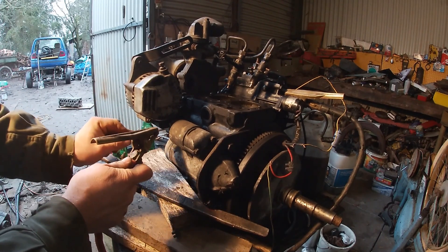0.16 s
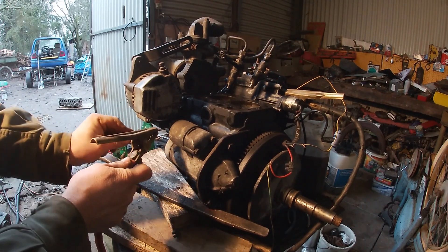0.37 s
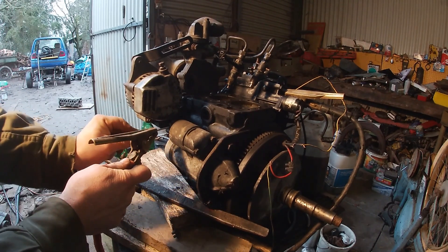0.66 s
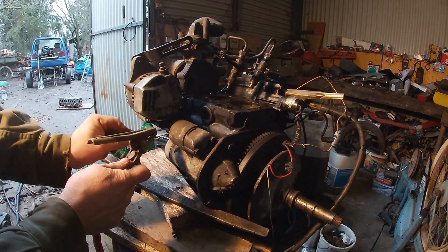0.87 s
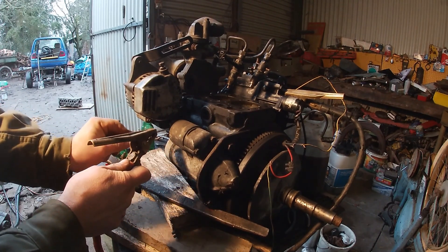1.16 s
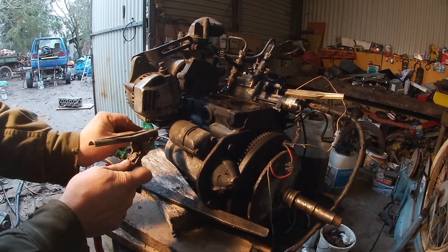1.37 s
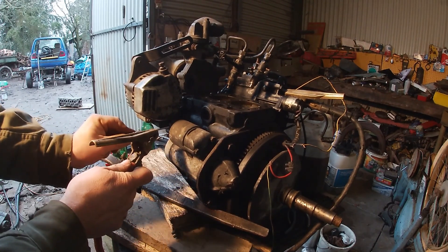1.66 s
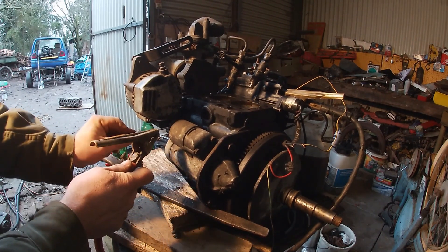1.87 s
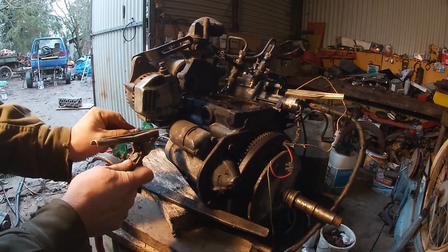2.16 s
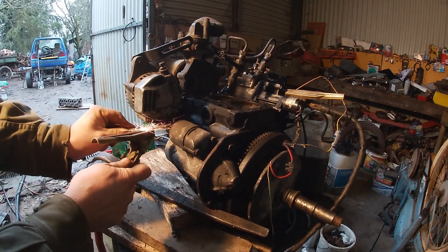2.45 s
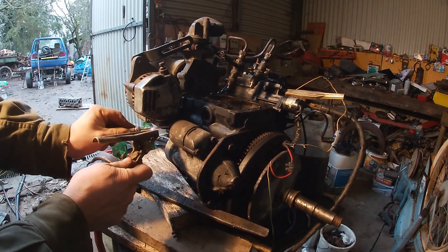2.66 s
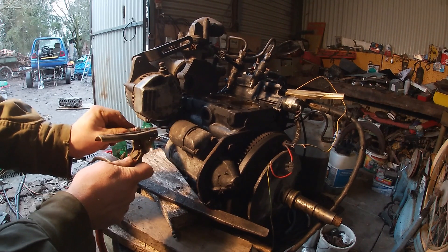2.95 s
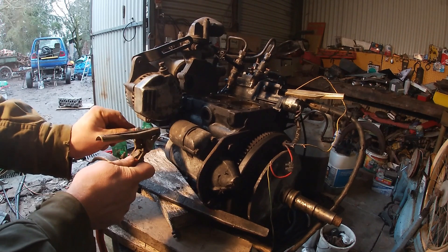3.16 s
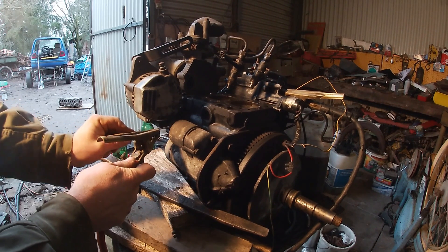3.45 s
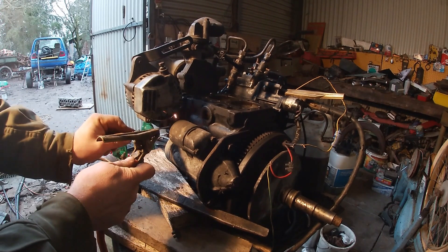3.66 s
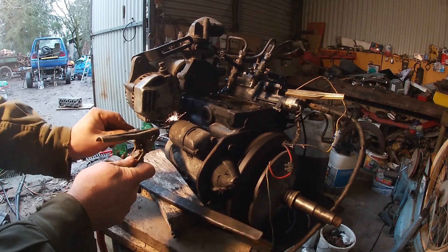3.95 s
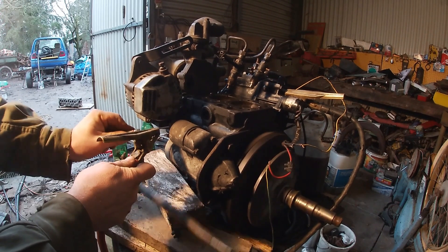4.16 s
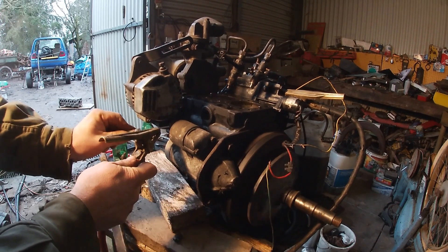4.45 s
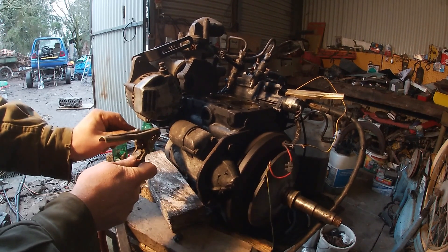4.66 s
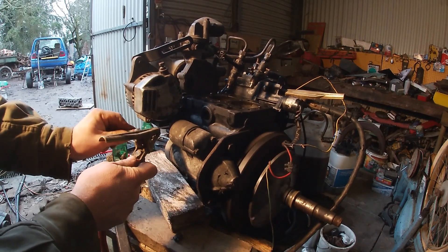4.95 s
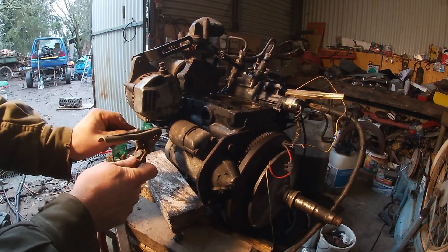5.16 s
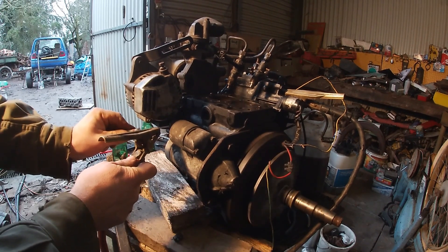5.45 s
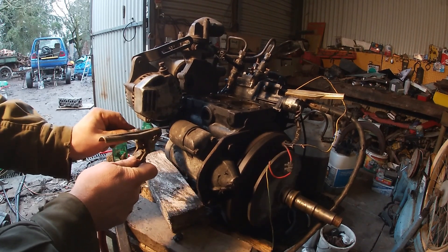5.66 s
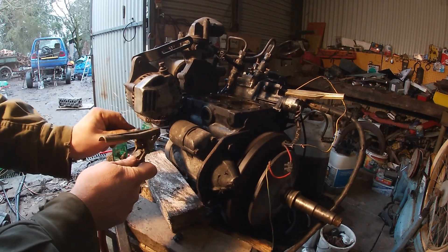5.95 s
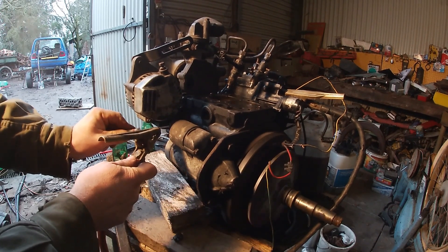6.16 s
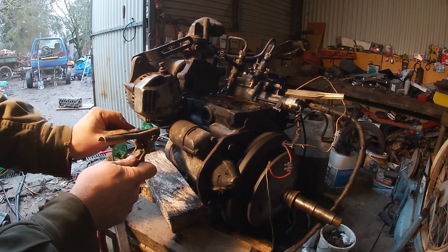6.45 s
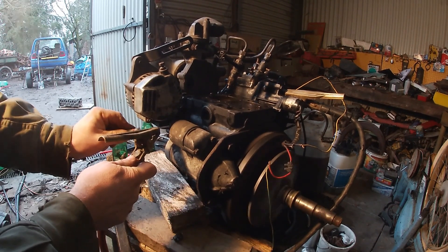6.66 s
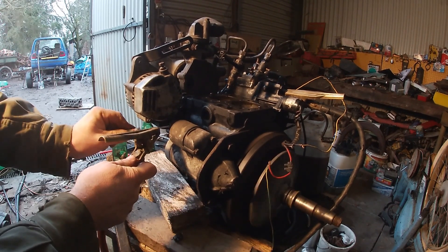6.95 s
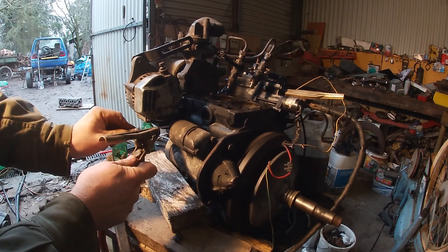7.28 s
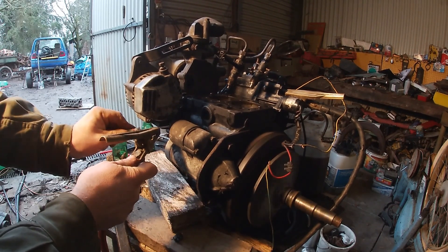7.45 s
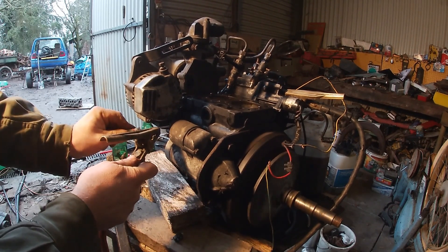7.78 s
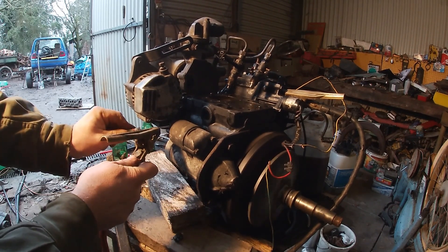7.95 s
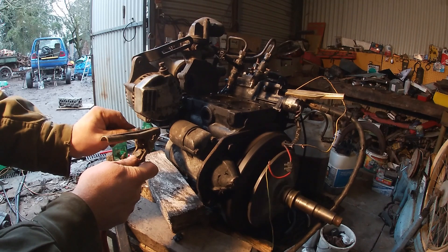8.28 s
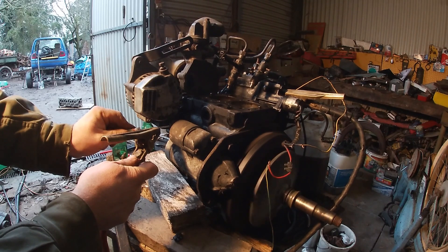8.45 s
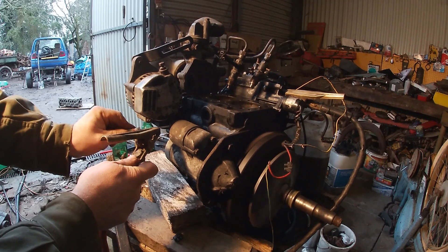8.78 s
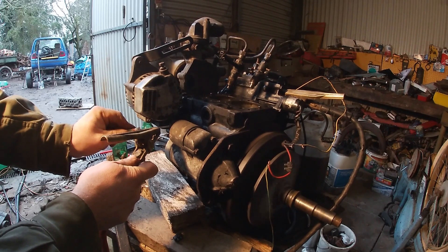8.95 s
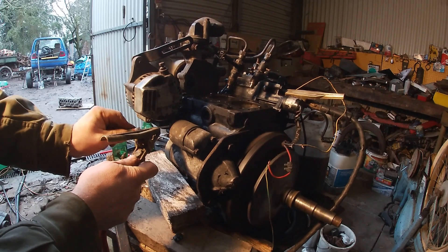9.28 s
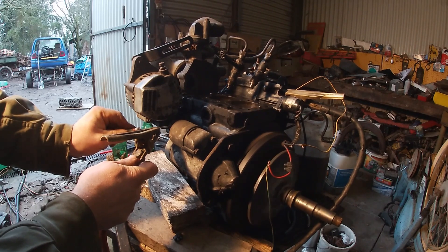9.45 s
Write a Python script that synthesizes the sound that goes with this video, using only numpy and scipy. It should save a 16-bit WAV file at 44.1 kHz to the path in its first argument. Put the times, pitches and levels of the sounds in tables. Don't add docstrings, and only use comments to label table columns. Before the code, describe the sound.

Metal clicks and quiet fumbling give way to crackling electric contacts and brief starter whirs, hard wooden thumps, then rattling cranking that never fires

```python
import sys
import numpy as np
from scipy import signal
from scipy.fft import rfft, irfft
from scipy.io import wavfile
from scipy.ndimage import uniform_filter1d

SR = 44100
rng = np.random.default_rng(int(sys.argv[2]) if len(sys.argv) > 2 else 0)


def ratio_of_db(decibels):
    return 10 ** (np.asarray(decibels, float) / 20)


def file_out(sig):
    cols = np.atleast_2d(sig).T
    lim = np.clip(cols, -1, 1)
    pcm = np.round(lim * 32767).astype(np.int16)
    wavfile.write(sys.argv[1], SR, pcm)


N = 424241
TIME = np.arange(N) / SR
CONTROL_STEP = 16
ENGAGE_S = 5.36
ENGAGED = TIME > ENGAGE_S

# (frequency [Hz], spectral density [dB per Hz])
BRUSH_SPECTRUM = [(2940, -19), (5000, -0.5), (5300, -2), (6000, 3.5), (6710, 4.5), (7280, 5), (8090, 5.5),
                  (8450, 1), (9040, -3.5), (9950, -11), (10500, -26), (11900, -14.5), (13400, -53),
                  (14600, -46), (15800, -56)]
# (frequency [Hz], spectral density [dB per Hz])
WOOD_SPECTRUM = [(45, -20), (88, -2.5), (150, -0.5), (442, -4.5), (782, -3), (986, -5.5), (1590, -7),
                 (1750, -10), (2650, -13.5), (4600, -21), (6000, -36), (7800, -50), (13200, -120)]
# (frequency [Hz], spectral density [dB per Hz])
FRICTION_SPECTRUM = [(880, -40), (1500, -3.5), (2220, -4), (2800, 0.5), (3050, -3), (3820, -6.5),
                     (6670, -8.5), (7690, -3.5), (9000, -18), (11000, -38), (14300, -70), (22000, -120)]


def unit(x):
    return x / np.sqrt(np.mean(x ** 2))


def colour(x, points):
    hz, db = np.transpose(points)
    grid = np.maximum(np.fft.rfftfreq(8192, 1 / SR), 1)
    cepstrum = irfft(np.log(ratio_of_db(np.interp(np.log(grid), np.log(hz), db))))
    cepstrum[1:4096] *= 2
    cepstrum[4097:] = 0
    response = irfft(np.exp(rfft(cepstrum)))[:4096]
    return signal.oaconvolve(x, response / np.sqrt(np.sum(response ** 2)))[:len(x)]


def resonate(x, hz, q):
    return signal.lfilter(*signal.iirpeak(hz, q, SR), x)


def ring(x, modes, flicker_db, later=0):
    total = 0
    for k, (hz, width, db, *gained) in enumerate(modes):
        drive = x * ratio_of_db(db + later * sum(gained) + flicker_db * walk(35))
        total = total + (-1) ** k * resonate(drive, hz, hz / width)
    return unit(total)


def highpass(x, order, hz):
    return signal.lfilter(*signal.butter(order, hz, "high", fs=SR), x)


def walk(rate):
    k = int(SR / rate)
    levels = np.repeat(rng.standard_normal(N // k + 1), k)
    return 1.3 * uniform_filter1d(uniform_filter1d(levels, k), k)[:N]


def grit(scatter_db):
    size = np.minimum(rng.exponential(size=N), 4.5)
    return unit(rng.standard_normal(N) * ratio_of_db(scatter_db * size))


def add(out, s, sound):
    i = int(s * SR)
    out[i:i + len(sound)] += sound[:N - i]


def control_time():
    return np.arange(0, N, CONTROL_STEP) / SR


def held(control):
    return np.repeat(control, CONTROL_STEP, axis=-1)[..., :N]


def swells(s, db, fade_s, rise_share):
    t, total = control_time(), 0
    for at, peak_db, fade in zip(s, db, fade_s):
        away = np.maximum((t - at) / fade, (at - t) / (fade * rise_share))
        total = total + ratio_of_db(peak_db - 20 * away)
    return held(total)


def effort():
    # (time [s], rise [s], powered
    # [s], gear chatter [dB], brush hiss [dB])
    contacts = [(0.0, 0.00073, .3, -32.5, -39), (2.582, 0.023, 0.53, -23, -27),
                (3.413, 0.012, .44, -22.5, -25.5), (3.933, 0.0068, 0.41, -21, -22.5),
                (4.06, 0.065, .3, -25.5, -23), (4.265, 0.0089, 0.091, -23, -25.5),
                (4.547, 0.0036, .01, -25, -30), (5.095, 0.0043, .3, -34, -50),
                (5.362, 0.03, .12, -30.5, -55), (5.434, 0.0089, .1, -22, -41),
                (5.47, 0.035, 0.1, -17, -26.5), (5.865, 0.045, 0.15, -17, -25.5),
                (6.355, 0.039, 4.0, -17.5, -25.5)]
    # (time [s], depth [dB], length [s])
    slips = [
        (3.851, 5.5, 0.072),
        (3.044, 5, 0.068),
        (5.602, 4.5, 0.032),
        (7.276, 6, 0.015),
        (8.59, 2, 0.018),
        (8.775, 8.5, 0.015),
        (9.389, 6, 0.015),
    ]
    stalls_s = (0.0, 5.1)
    t, gain = control_time(), 0
    for s, rise, powered, gear_db, brush_db in contacts:
        on = np.maximum(t - s - rise, 0)
        off = np.maximum(t - s - powered, 0)
        stalled = np.maximum(t - min([x for x in stalls_s if x >= s], default=N), 0)
        stalled = stalled * (1 + stalled / 0.13)
        inrush = (s < ENGAGE_S) * 2 * np.exp(-on / 0.058)
        coast = 8.5 * (1 - np.exp(-off / 0.27))
        gear = gear_db + inrush - coast - 57 * stalled
        lag = 6 * np.exp(-on / 0.03)
        brush = brush_db - lag - 38 * off - 88 * stalled
        gain = gain + np.clip((t - s) / rise, 0, 1) * (ratio_of_db(np.array([gear, brush])) - gain)
    slip_db = 0
    for s, depth_db, length in slips:
        inside = np.minimum(t - s, s + length - t)
        slip_db = slip_db + depth_db * np.clip(inside / 0.0032 + 1, 0, 1)
    return held(gain * ratio_of_db(-slip_db * np.array([[1], [1.3]])))


def gear_chatter(turn):
    # (frequency [Hz], width [Hz], level [dB], gain at full speed [dB])
    housing_modes = [(1240, 153, 1, 0.5), (1319, 37, 7, -0.5), (1583, 97, -2, -0.5), (1760, 13, -3, -8),
                     (1831, 15, -5.5, -2), (2248, 140, 3, 0), (2990, 100, -2.5, 0), (3100, 18, 5, 0.5),
                     (3213, 64, -6, 4.5), (3355, 32, 5, -0.5), (3710, 197, -1.5, -0.5), (4500, 27, -4.5, 3),
                     (4750, 104, -5, 2.5), (5880, 256, -3.5, -0.5), (6510, 270, -6, 1.5)]
    # (frequency [Hz], width [Hz], level [dB], gain once run in [dB])
    pinion_modes = [(1207, 255, 2.5, 0), (1860, 45, 3, 3), (2108, 87, 6.5, -3.5), (2580, 56, 3.5, 3.5),
                    (2985, 100, 5.5, -8), (3190, 110, -0.5, 7), (3750, 150, -2.5, 0), (5570, 75, -1, -9),
                    (4960, 33, -2, 0.5)]
    # (frequency [Hz], spectral density [dB per Hz])
    gear_spectrum = [(350, -45.5), (600, -9), (887, -15.5), (1240, -0.5), (1990, -9), (2570, -9.5),
                     (2790, -3), (3800, 1.5), (5320, -14), (6600, -11), (10000, -25), (15000, -47)]
    teeth = grit(2.5) * ratio_of_db(2.2 * turn + .5 * walk(14))
    run_in = np.interp(TIME, (3.3, 4.0), (0, 1))
    settled = np.interp(TIME, (6.8, 8.1), (0, 1))
    cranking = ring(teeth, housing_modes, 2.2, settled)
    free = .9 * ring(teeth, pinion_modes, 3.0, run_in)
    broad = ratio_of_db(-3.5 * settled) * colour(teeth, gear_spectrum)
    return unit(0.61 * broad + 0.87 * np.where(ENGAGED, cranking, free))


def brush_hiss():
    # (frequency [Hz], spectral density [dB per Hz])
    loaded_spectrum = [(2940, -23.5), (5000, 0.5), (5320, -4.5), (5780, 0), (6710, 4), (8210, -12.5),
                       (9810, -9), (11300, -28.5), (14300, -23.5), (15100, -46), (15800, -47)]
    # (frequency [Hz], width [Hz], level [dB])
    cap_modes = [(4910, 130, 8.5), (7000, 170, 5), (7600, 30, -17), (8100, 95, 5.5), (8720, 140, 8),
                 (11500, 80, -30), (11800, 200, -35.5)]
    rub = grit(3.5) * ratio_of_db(1.5 * walk(30))
    free = colour(rub, BRUSH_SPECTRUM) + .5 * 0.97 * ring(rub, cap_modes, flicker_db=3.5)
    return np.where(ENGAGED, colour(rub, loaded_spectrum), free)


def block_rumble():
    # (frequency [Hz], spectral density [dB per Hz])
    block_spectrum = [(35, -41), (60, -9), (113, -16), (161, -2), (190, -4.5), (268, -8), (308, 0.5),
                      (368, -3.5), (639, -4), (736, -7.5), (932, -6.5), (1000, -1), (1300, -32.5),
                      (2200, -120)]
    rumble = colour(grit(0.66) * ratio_of_db(1.02 * walk(12)), block_spectrum)
    return np.where(ENGAGED, rumble, highpass(rumble, 3, 78))


def bell_peal(turn):
    # (frequency [Hz], width [Hz], level [dB])
    bell_modes = [(2592, 26, 0)]
    # (frequency [Hz], width [Hz], level [dB])
    rim_modes = [(2522, 34, 2), (2556, 34, 0)]
    blows = grit(3.6) * ratio_of_db(2.3 * turn)
    rim = ring(ring(blows, rim_modes, flicker_db=0.5), [(2538, 74, 0)], flicker_db=1.5)
    rim_share = np.interp(TIME, (7.3, 7.9), (.3, .85))
    return resonate(ring(blows, bell_modes, flicker_db=1.0) + rim_share * rim, 2565, 11)


def bell_flares():
    # (time [s], level [dB])
    flares = [(3.5, 9), (6.02, 7), (6.27, 14), (6.47, 3), (6.58, 1), (6.7, 5), (6.84, 6.5), (6.97, 7),
              (7.09, 6), (7.15, 8), (7.2, 5), (7.33, 5), (7.47, 9), (7.63, 2), (7.928, 9), (7.97, -1),
              (8.07, 3), (8.12, 5), (8.2, 1.5), (8.25, 9.5), (8.36, 8.5), (8.41, 3), (8.45, 6),
              (8.515, 2.5), (8.545, 12.5), (8.75, 1), (8.845, 5), (8.96, 8.5), (9.07, 1), (9.13, 7),
              (9.35, 7.5), (9.45, 5), (9.5, -1), (9.57, 7)]
    t = control_time()
    return held(sum(1.14 * db * np.exp(-((t - s) / 0.016) ** 2) for s, db in flares))


def motor():
    gear, brush = effort()
    full = gear / ratio_of_db(-20)
    turn_hz = 40.12 * (1 + 0.05934 * walk(4.5))
    turn = np.cos(2 * np.pi * np.cumsum(turn_hz) / SR)
    block = ratio_of_db(np.where(ENGAGED, -30, -35.5)) * full ** 0.34
    cranked_db = -29.5 + np.interp(TIME, (6.15, 6.3), (-4, 0))
    bell = ratio_of_db(np.where(ENGAGED, cranked_db, -41) + bell_flares()) * full ** 1.6
    return gear * gear_chatter(turn) + brush * brush_hiss() + block * block_rumble() + bell * bell_peal(turn)


def air():
    # (time [s], level [dB], time to fade 20 dB [s])
    gusts = [(.5, -56, 0.1), (1.5, -43.5, 0.3), (2.35, -48, 0.8), (2.6, -29.5, 0.12), (3.91, -35, 0.28),
             (4.6, -32, 0.22), (5.7, -58, -2), (6.3, -60, -1), (7.3, -54, 0.5), (8.4, -52, 1),
             (9.3, -51, 0.5)]
    # (frequency [Hz], spectral density [dB per Hz])
    yard_spectrum = [(29, -35), (50, -23), (93, -15), (177, 9.5), (241, -1), (586, -14), (817, -8),
                     (1330, -8), (2170, -34), (7330, -48), (10000, -46), (13000, -80), (22000, -120)]
    low = signal.butter(3, [16, 48], "band", fs=SR, output="sos")
    push = unit(signal.sosfilt(low, rng.standard_normal(N)))
    wind = (ratio_of_db(-73) + swells(*np.transpose(gusts), rise_share=1.15)) * push
    return wind + ratio_of_db(-60 + 3.6 * walk(2.04)) * colour(rng.standard_normal(N), yard_spectrum)


def hand_moves():
    # (time [s], rustle [dB], shuffle [dB], time to fade 20 dB [s]); a negative fade swaps rise and fall
    moves = [
        (.66, -62, -56.5, 1.13),
        (.94, -45.5, -48, -0.01),
        (1.3, -47, -46, 0.18),
        (1.47, -62, -57, 0.2),
        (1.77, -62, -56, 0.3),
        (2.05, -62, -68, 0.5),
        (2.36, -75, -64, -1),
        (2.55, -65, -49, 0.07),
        (.07, -43, -39, 0.13),
        (5.2, -60, -37, 0.27),
    ]
    # (frequency [Hz], width [Hz], level [dB])
    jaw_modes = [(1700, 300, -1), (2830, 440, 1), (4700, 1200, -2.5), (6940, 400, -5), (7800, 900, -3)]
    at, rustle_db, shuffle_db, fade_s = np.transpose(moves)
    rustle = ratio_of_db(-81) + swells(at, rustle_db, fade_s, 0.34)
    shuffle = ratio_of_db(-81) + swells(at, shuffle_db, fade_s, 0.34)
    rub = grit(3.2) * ratio_of_db(2.0 * walk(39.8))
    cable = 0.88 * colour(rub, FRICTION_SPECTRUM) + .5 * ring(rub, jaw_modes, flicker_db=5.0)
    return rustle * cable + shuffle * highpass(colour(grit(4.6), WOOD_SPECTRUM), 4, 130)


def clamp_ticks():
    # (time [s], peak [dB], frequency [Hz], length [s])
    ticks = [(0.13, -30, 3800, .004), (0.157, -26, 3100, .005), (0.169, -30, 4500, .004),
             (0.228, -32, 5500, 0.0025), (0.59, -51, 7000, .004), (0.623, -36, 6500, .003),
             (0.6406, -34, 2100, .004), (0.647, -39, 6500, .004), (0.694, -42, 1800, .004),
             (0.722, -37, 1900, .014), (0.735, -41, 6500, .004), (0.8105, -31.5, 3600, .002),
             (0.930, -25, 6000, .002), (0.9436, -18, 4500, .002), (0.95, -22, 3480, .003),
             (0.990, -36, 4500, .003), (1.2467, -44, 1500, .006), (1.306, -23.5, 5140, 0.0035),
             (1.332, -43, 1650, 0.025), (1.368, -44, 2980, .004), (1.4533, -46, 7500, .006),
             (1.487, -48, 2900, 0.025), (1.538, -41, 2800, 0.0061), (1.750, -48, 1950, .004),
             (1.766, -34, 2900, .003), (1.8085, -41, 4000, .003), (2.3515, -43, 5000, .003),
             (2.518, -39, 1700, .003), (5.062, -35, 9000, .003), (5.075, -35, 9000, .003),
             (5.13, -36, 8000, .003), (5.155, -36, 8000, .003), (5.197, -39, 7500, .004),
             (5.215, -44, 7000, .004), (5.253, -37, 4500, .004)]
    out = np.zeros(N)
    t = np.arange(SR // 8) / SR
    crackle = colour(grit(2.2), FRICTION_SPECTRUM)
    rise = 1 - np.exp(-t / .00015)
    edge = ratio_of_db(-10) * 4 * np.exp(-t / 0.00055)
    for s, db, hz, length in ticks:
        burst = crackle[int(s * SR):][:len(t)] * rise * (np.exp(-t / length) + edge)
        add(out, s, ratio_of_db(db - 12.0) * (0.43 * burst + 2 * resonate(burst, hz, 1.9)))
    return signal.lfilter(*signal.butter(3, 10500, fs=SR), out)


def jaw_pings():
    # (time [s], peak [dB])
    pings = [
        (0.172, -43),
        (1.7656, -46),
    ]
    # (frequency [Hz], level [dB], T60 [s])
    clamp_modes = [(2379, -15, 0.042), (2860, 5.5, 0.045), (5200, -9, 0.025)]
    out = np.zeros(N)
    t = np.arange(SR // 8) / SR
    for s, ping_db in pings:
        for hz, mode_db, t60 in clamp_modes:
            decay = 1000. ** (-t / t60)
            add(out, s, ratio_of_db(ping_db + mode_db + 1.0) * decay * np.sin(2 * np.pi * hz * t))
    return out


def spring_squeak():
    # (time [s], frequency [Hz], level [dB])
    squeaks = [
        [(1.775, 6500, -67), (1.811, 6395, -65), (1.883, 6929, -57), (1.947, 6272, -61), (2.1, 6115, -79)],
        [(2.115, 7872, -63), (2.187, 7923, -69), (2.2, 7771, -77)],
    ]
    tone = 0
    for glide in squeaks:
        s, hz, db = np.transpose(glide)
        phase = 2 * np.pi * np.cumsum(np.interp(TIME, s, hz)) / SR
        tone = tone + ratio_of_db(np.interp(TIME, s, db, -150, -150)) * np.sin(phase)
    return tone * ratio_of_db(3.0 * walk(120))


def bench():
    # (time [s], peak [dB], frequency [Hz])
    bumps = [
        (0.509, -35, 128),
        (1.023, -39, 144),
        (1.193, -26, 192),
        (1.405, -27.5, 140),
        (1.562, -37, 155),
        (2.005, -32, 142),
        (2.15, -41.5, 145),
        (2.318, -41, 147),
        (2.472, -25, 152),
    ]
    # (time [s], peak [dB], frequency [Hz], crack [dB])
    knocks = [(2.58, -23.5, 148.3, -15.5), (2.954, -38, 281, -24), (3.11, -28, 232, -18),
              (3.416, -23, 152, -19.5), (3.52, -38, 203, -27), (3.834, -13.5, 165.5, -11.5),
              (3.879, -17, 89, -20), (3.964, -26, 160, -28), (4.267, -42, 304, -12.5),
              (4.282, -17.5, 98, -44), (4.374, -17, 79, -12), (4.394, -7, 92, -16.5),
              (4.497, -12, 101.5, -9), (4.55, -15, 106, -4), (4.562, -5, 97.7, -39),
              (4.602, -11.5, 300, -10.5), (5.087, -20, 200, -15)]
    hits = [(s, db, hz, -58, 0.037) for s, db, hz in bumps]
    hits += [(s, db, hz, crack_db, 0.058 * (100 / hz) ** 0.52) for s, db, hz, crack_db in knocks]
    rock, crack = np.zeros((2, N))
    t = np.arange(SR // 2) / SR
    sway = walk(69.0)[:len(t)]
    for s, db, hz, crack_db, length in hits:
        phase = 2 * np.pi * hz * np.cumsum(1 + 0.13 * np.roll(sway, int(s * SR))) / SR
        fade = (1 - np.exp(-t / 0.0024)) * np.exp(-(t / length) ** 2)
        overtone = 0.35 * np.exp(-t / 0.027) * np.sin(1.71 * phase)
        add(rock, s, ratio_of_db(db - 4.0) * fade * (np.sin(phase) + overtone))
        add(crack, s, ratio_of_db(crack_db - 6.5) * (1 - np.exp(-t / 0.00069)) * np.exp(-t / 0.029))
    return highpass(rock * ratio_of_db(2.5 * walk(60)) + crack * colour(grit(5.7), WOOD_SPECTRUM), 2, 65)


def arcs():
    # (time [s], peak [dB])
    snaps = [(2.5565, -4), (2.5793, -6), (2.612, -1), (2.6592, 6), (2.669, -3), (2.6772, -3.5), (2.689, 3),
             (2.6915, -2), (2.7002, -1), (2.770, 1), (2.919, -2), (3.116, -4), (3.4092, 3), (3.823, -1),
             (5.094, -17), (5.3927, 6), (5.439, -18)]
    # (frequency [Hz], spectral density [dB per Hz])
    snap_spectrum = [(300, -25), (1250, -3), (1900, -9), (3000, -3), (3400, -8), (3850, 3), (4600, -7),
                     (8000, -7), (10000, -27), (12500, -46), (16000, -70)]
    # (time [s], peak [dB], length [s], brightness [dB])
    sparks = [(2.559, -9, 0.0053, 1), (2.576, -17.5, 0.017, 8.5), (2.758, -11.5, 0.021, 5.5),
              (2.789, -13, 0.017, -8), (2.868, -4.5, 0.017, 6), (2.946, -3, 0.017, 3.5),
              (2.999, -4, 0.0089, 4), (3.032, -8, 0.0085, -3), (3.118, -6, 0.03, -15), (3.24, -7, 0.016, 2),
              (3.478, -8, 0.013, 0), (3.52, -8.5, 0.047, 2), (3.598, -4.5, 0.01, 9.5),
              (3.621, -9.5, 0.013, -4), (3.645, -6.5, 0.029, 6.5), (3.671, -8, 0.036, 3.5),
              (3.697, -5, 0.02, 3.5), (3.737, -5.5, 0.0078, 8), (3.754, -4.5, 0.0081, -15),
              (3.784, -1.5, 0.0082, 5.5), (3.823, -6.5, 0.0084, 9), (3.8314, 3.5, 0.014, -11),
              (4.549, -10, 0.012, -20), (4.602, -14, .008, -18), (5.092, -7, 0.0094, -27.5),
              (5.392, -2, 0.0054, -22)]
    # (frequency [Hz], spectral density [dB per Hz])
    spark_spectrum = [(240, -44), (400, -13.5), (597, -15), (850, 2.5), (1750, -1), (2270, 3.5),
                      (3840, -1.5), (4410, -8), (4910, -4.5), (8030, -12.5), (15800, -53)]
    dull, bright, snap = np.zeros((3, N))
    for s, db in snaps:
        add(snap, s, ratio_of_db(db) * np.array([-0.93, -0.45, 0.25, 0.3]))
    for s, db, length, bright_db in sparks:
        u = np.arange(int(2 * length * SR)) / (length * SR)
        shape = np.minimum(u / .4, 1) * np.exp(-u ** 2.5)
        start = s - .15 * length - .001
        add(dull, start, ratio_of_db(db - 11.0) * shape)
        add(bright, start, ratio_of_db(db + bright_db - 13.5) * shape)
    spit = dull * colour(grit(2.9), spark_spectrum) + bright * colour(grit(1.0), BRUSH_SPECTRUM)
    return spit + 1.25 * colour(snap, snap_spectrum)


def singing_parts():
    # (time [s], length [s], level [dB], frequency [Hz])
    cover = [(7.532, 0.054, -32.5, 1836), (7.648, 0.086, -24, 1855), (7.811, 0.115, -27, 1854),
             (7.965, 0.046, -33, 1832), (8.27, 0.064, -32.5, 1850), (8.568, 0.056, -30, 1850),
             (8.665, 0.037, -33, 1854), (8.867, 0.062, -32, 1845), (9.136, 0.094, -30.5, 1850),
             (9.278, 0.068, -34.5, 1866), (9.446, 0.078, -30, 1846)]
    # (time [s], length [s], level [dB], frequency [Hz])
    tolls = [(7.7, .1, -31, 1200), (6.6, .06, -27, 1010), (7.41, .05, -34, 3340), (9, 0.051, -28, 3920),
             (8.68, 0.065, -25, 1570), (9.2, 0.034, -26, 3340), (9.29, .04, -31, 1550),
             (9.3, .05, -31, 1500), (9.45, 0.0286, -28.5, 670), (8.57, .04, -29, 1540),
             (3.95, .08, -33.5, 3800), (3.6, .1, -33, 5030), (4.4, .05, -34, 2300), (4.2, .04, -31, 2300),
             (3.8, .09, -41, 5020), (4.31, 0.065, -30, 2800), (4.35, 0.11, -31, 5010),
             (4.1, 0.091, -31, 2580), (4.56, .06, -36, 2300), (3.478, .015, -23, 4200),
             (3.2, .02, -27, 3400), (2.58, 0.0154, -24, 1150), (5.09, 0.0117, -23, 436),
             (4.1, .012, -24, 1250), (2.612, .02, -25, 3080), (2.635, 0.0148, -27, 2980),
             (5.56, 0.033, -25.5, 2600), (5.765, .04, -27, 2600), (5.09, 0.0121, -25.5, 2250),
             (5.092, 0.0124, -27, 4000), (5.09, 0.0123, -27, 857), (4.551, .02, -18, 1550),
             (5.434, 0.0205, -24.5, 1080), (5.875, .03, -26, 1340), (5.98, .03, -25, 1560),
             (5.99, .04, -25, 3720), (6.04, .03, -23, 3700), (6.12, .03, -25, 3800),
             (6.81, .09, -25.5, 1220), (6.6, .02, -29, 3080), (3.782, 0.0148, -22, 870),
             (3.6, 0.0214, -27, 880), (8.0, .3, -38, 3200)]
    out, flutter = np.zeros(N), walk(150)
    for s, length, db, hz in list(cover) + list(tolls):
        i = np.arange(int(1.24 * length * SR))
        start = int(s * SR)
        phase = 2 * np.pi * hz * np.cumsum(1 + 0.0048 * flutter[i + start]) / SR
        level = ratio_of_db(db + 3 + 3.5 * flutter[i + start // 2])
        add(out, s - .2 * length, level * np.sin(np.pi * i / len(i)) * np.sin(phase))
    return out


def run_up():
    # (time [s], length [s], start frequency [Hz], end frequency [Hz], level [dB])
    whines = [
        (2.584, 0.135, 402.4, 3070, -21),
        (3.42, 0.19, 953, 4000, -24.5),
        (5.432, .16, 1050, 2120, -25),
        (5.882, .2, 583, 907, -25),
        (6.361, 0.0446, 1032, 1197, -23),
        (6.45, 0.55, 863, 1308, -30.5),
    ]
    # (frequency [Hz], level [dB])
    response = [(450, -16), (800, -0.5), (1230, 5.5), (1650, -3.5), (2150, 0.5), (2550, -9), (3050, 2.5),
                (3400, -7), (3800, 1), (6000, -11)]
    out = np.zeros(N)
    wobble, flutter = walk(900), walk(150)
    for s, length, from_hz, to_hz, db in whines:
        i = np.arange(int(length * SR))
        u, now = i / len(i), i + int(s * SR)
        hz = (from_hz + (to_hz - from_hz) * np.sin(np.pi / 2 * u)) * (1 + .04 * wobble[now])
        phase = 2 * np.pi * np.cumsum(hz) / SR
        tone = 0
        for k, size in zip((1, 2, 3), (1, .6, .3)):
            tone = tone + size * ratio_of_db(np.interp(k * hz, *np.transpose(response))) * np.sin(k * phase)
        add(out, s, ratio_of_db(db + 4.5 * flutter[now]) * np.sin(np.pi * u ** 0.51) ** 0.52 * tone)
    return out


def shed_echo(near):
    t60_s, first_echo_s = .38, .006
    t = np.arange(SR) / SR
    band = signal.butter(2, [220, 5000], "band", fs=SR)
    tail = signal.lfilter(*band, rng.standard_normal(SR)) * 1000. ** (-t / t60_s) * (t > first_echo_s)
    return signal.fftconvolve(near, tail / np.sqrt(np.sum(tail ** 2)))[:N]


def scene():
    hands = hand_moves() + clamp_ticks() + jaw_pings() + spring_squeak()
    near = motor() + hands + bench() + arcs() + singing_parts() + run_up()
    return np.tile(near + ratio_of_db(-15) * shed_echo(near) + air(), (2, 1))


def low_pass(x):
    return signal.sosfilt(signal.butter(12, 15850, fs=SR, output="sos"), x)


def record(dry):
    cut = signal.ellip(8, .2, 70, 15780, fs=SR, output="sos")
    high = signal.butter(6, 12500, "high", fs=SR, output="sos")
    mono = .98 * np.tanh(dry[0] / .98)
    envelope = uniform_filter1d(np.abs(signal.sosfilt(high, mono)), size=256)
    side = ratio_of_db(6.5) * envelope * unit(signal.sosfilt(high, rng.standard_normal(N)))
    mix = signal.sosfilt(cut, np.array([mono + side, mono - side]))
    return low_pass(mix)


dry = scene()
out = record(dry)
file_out(out)
```